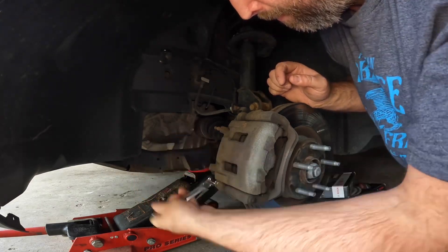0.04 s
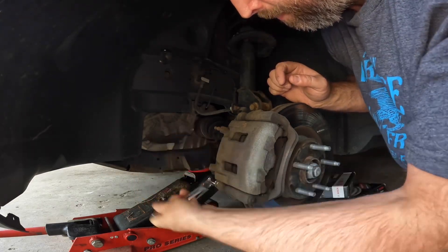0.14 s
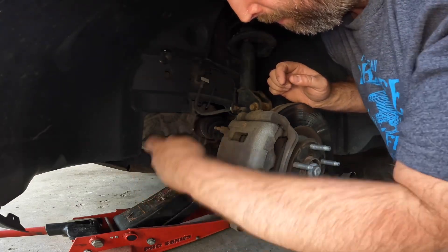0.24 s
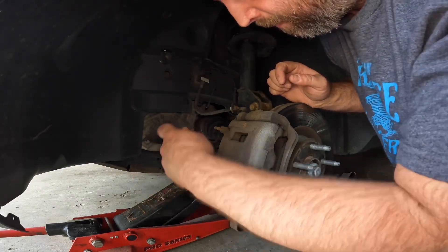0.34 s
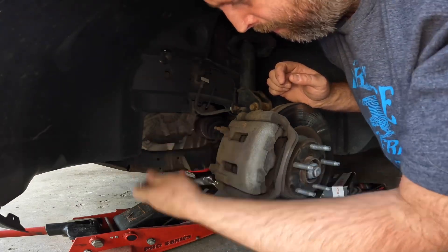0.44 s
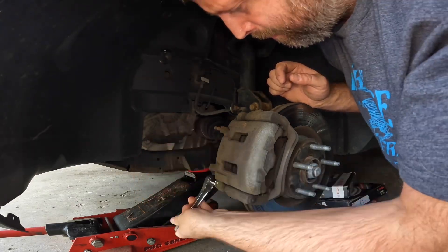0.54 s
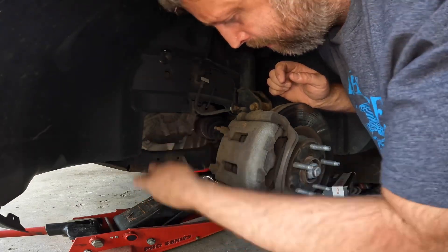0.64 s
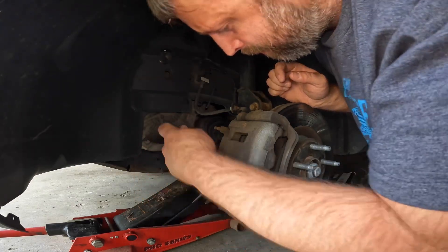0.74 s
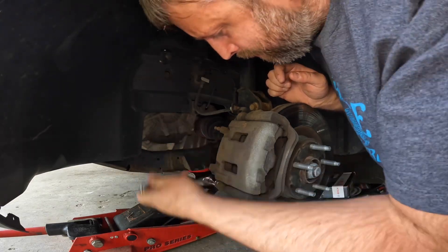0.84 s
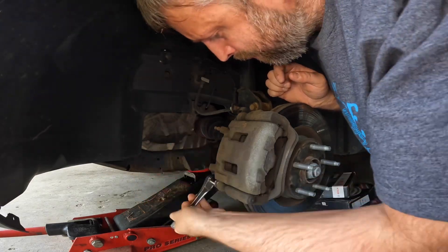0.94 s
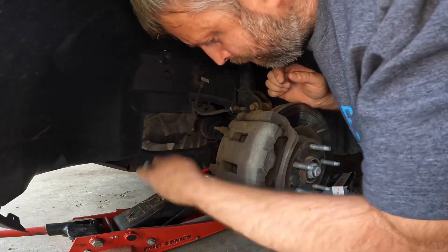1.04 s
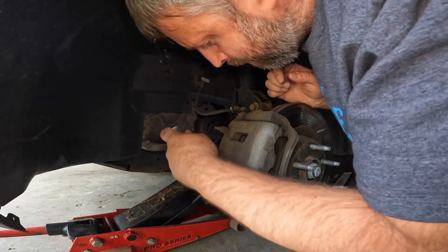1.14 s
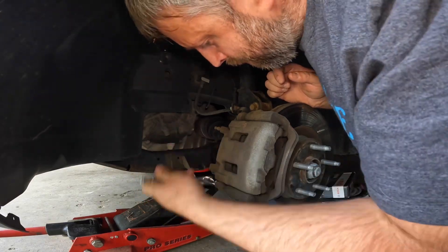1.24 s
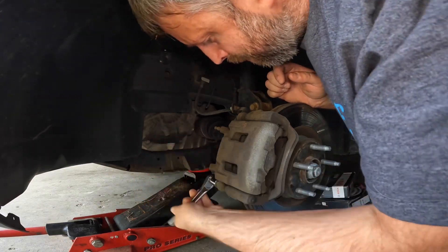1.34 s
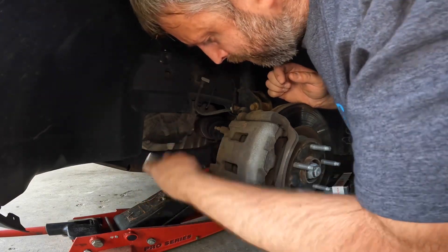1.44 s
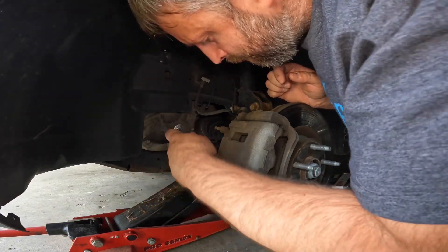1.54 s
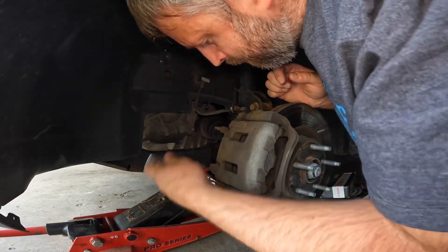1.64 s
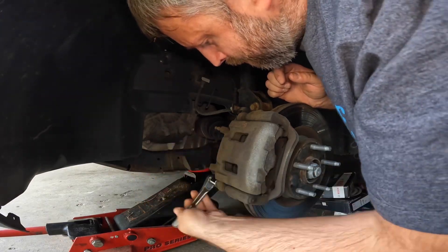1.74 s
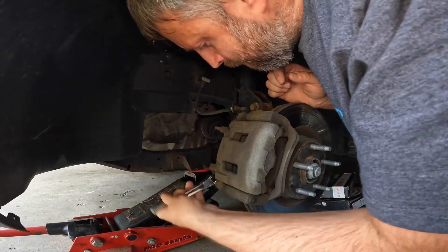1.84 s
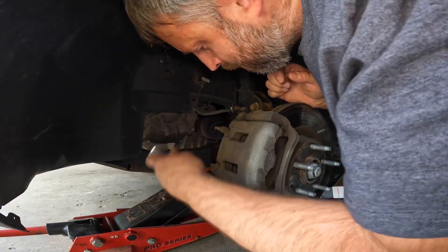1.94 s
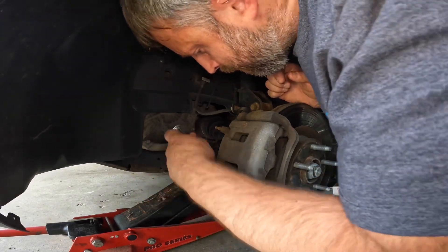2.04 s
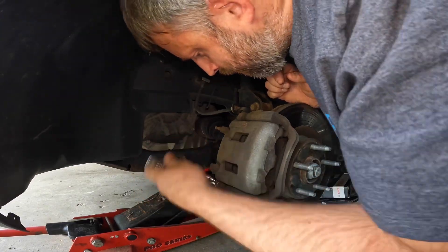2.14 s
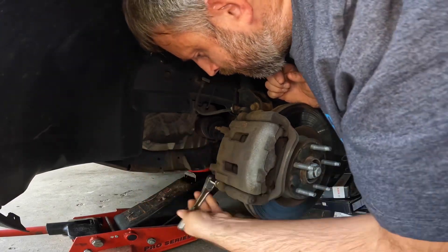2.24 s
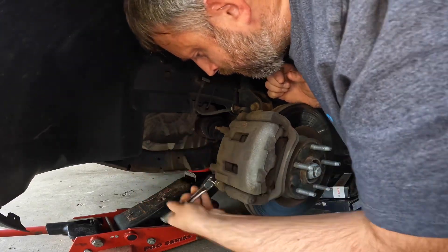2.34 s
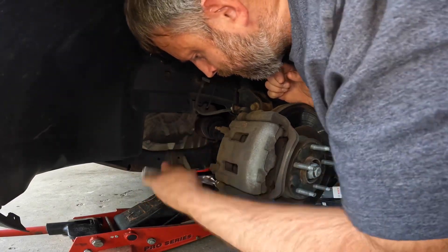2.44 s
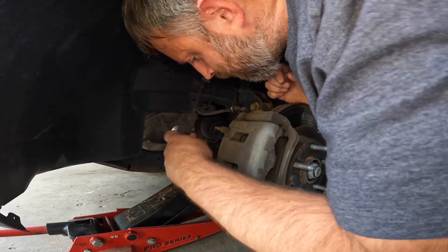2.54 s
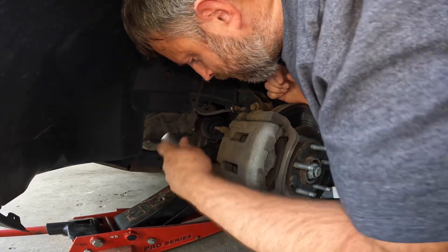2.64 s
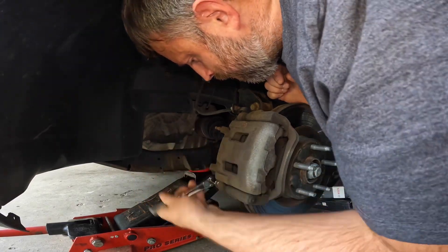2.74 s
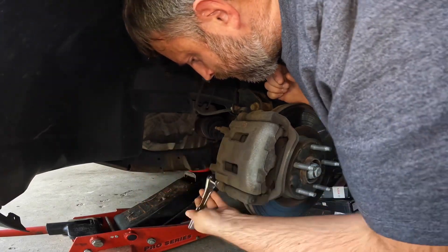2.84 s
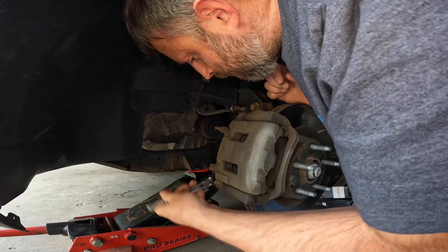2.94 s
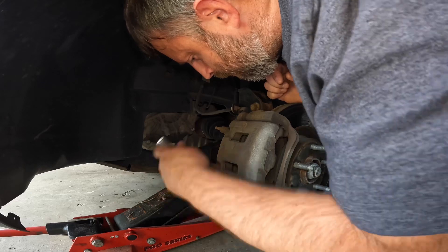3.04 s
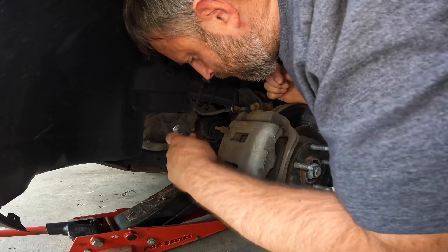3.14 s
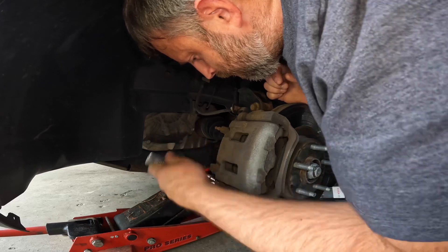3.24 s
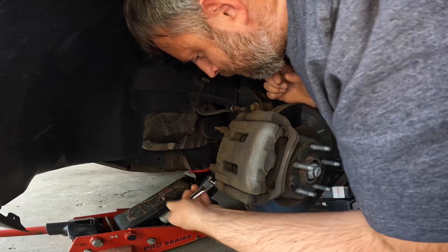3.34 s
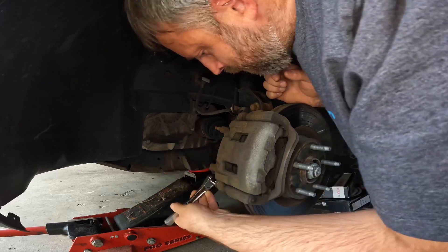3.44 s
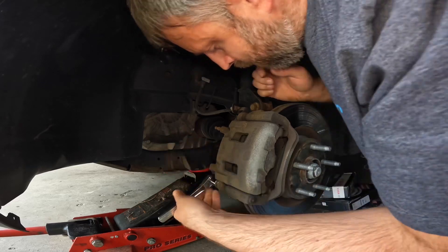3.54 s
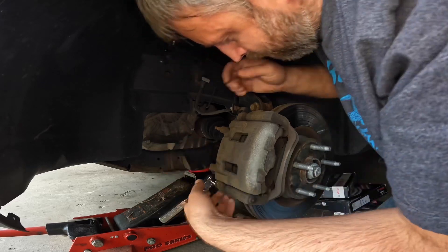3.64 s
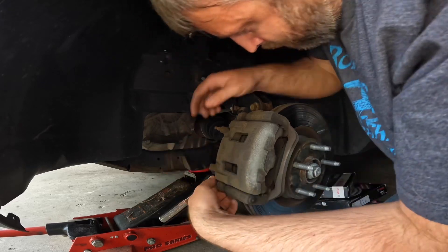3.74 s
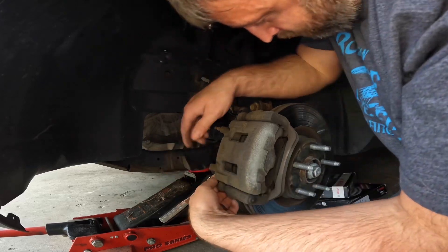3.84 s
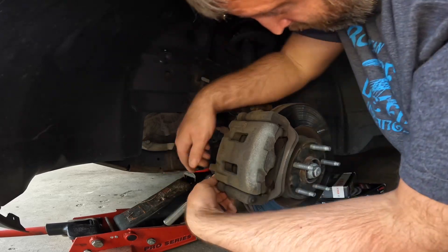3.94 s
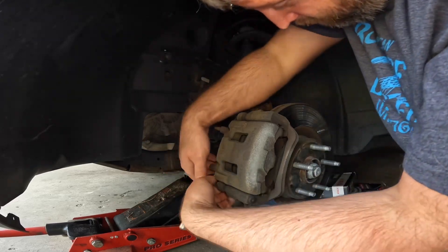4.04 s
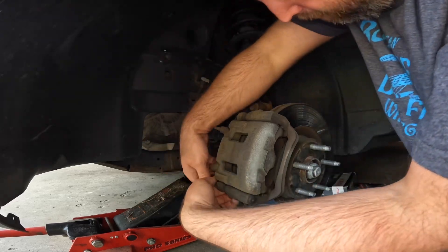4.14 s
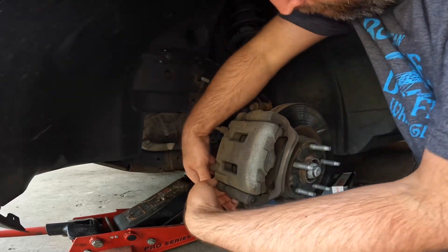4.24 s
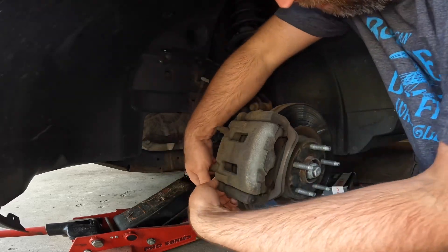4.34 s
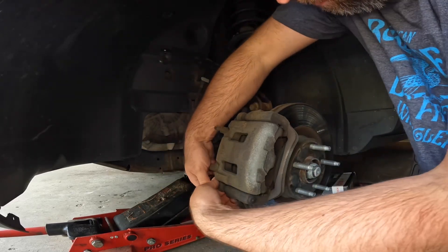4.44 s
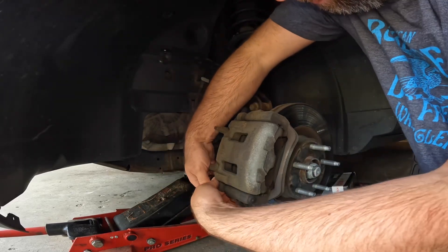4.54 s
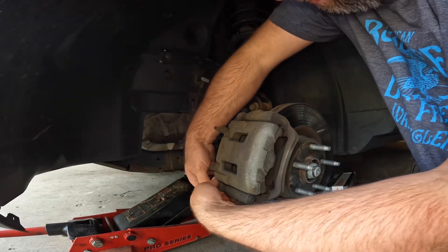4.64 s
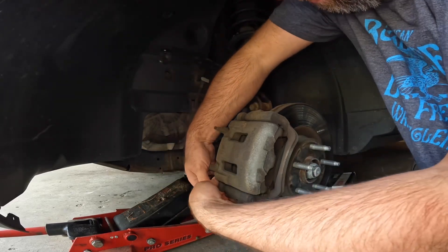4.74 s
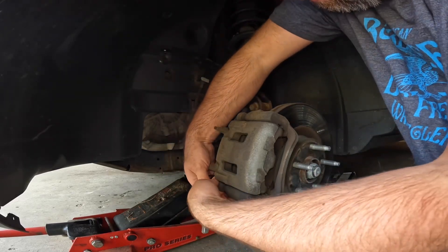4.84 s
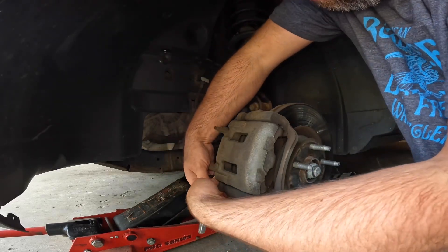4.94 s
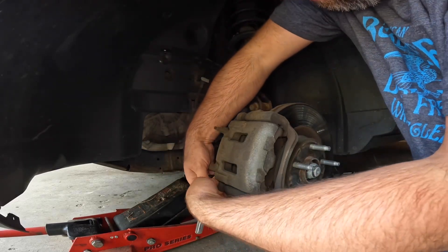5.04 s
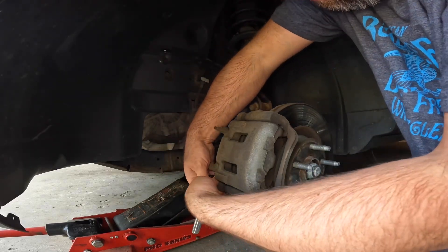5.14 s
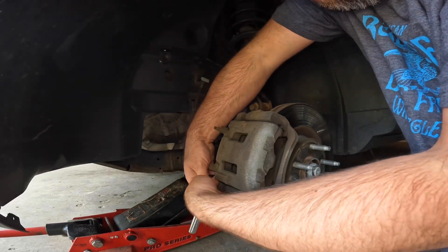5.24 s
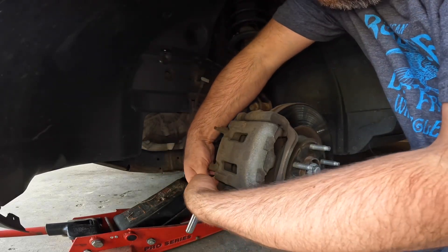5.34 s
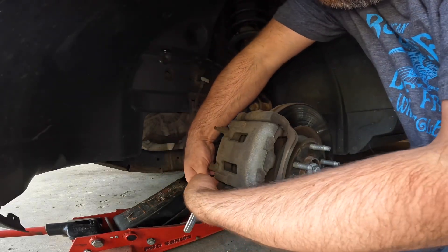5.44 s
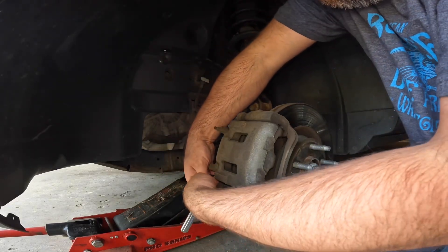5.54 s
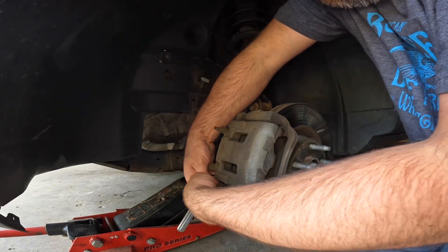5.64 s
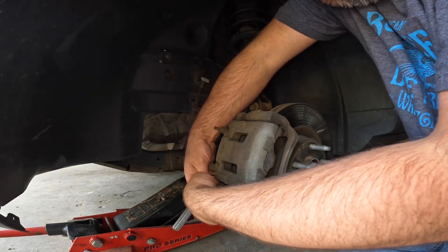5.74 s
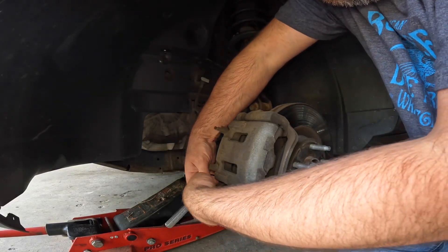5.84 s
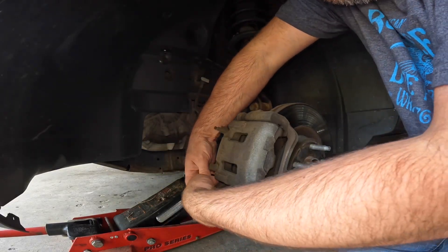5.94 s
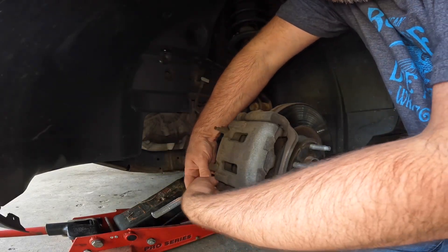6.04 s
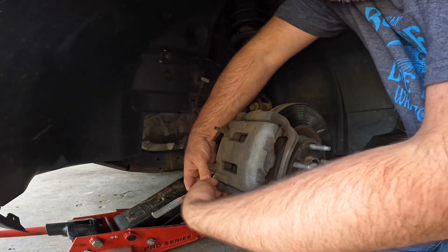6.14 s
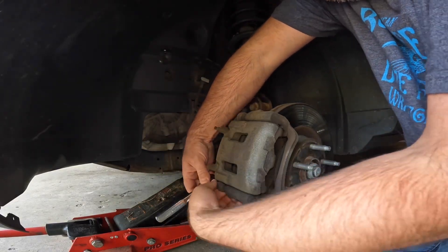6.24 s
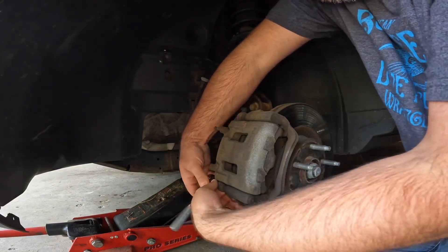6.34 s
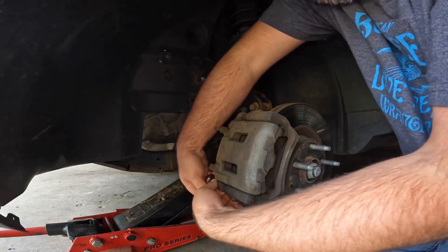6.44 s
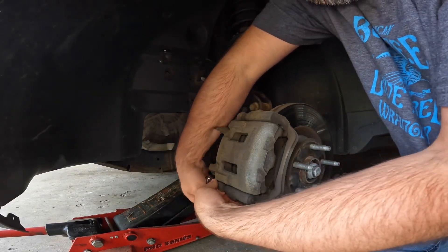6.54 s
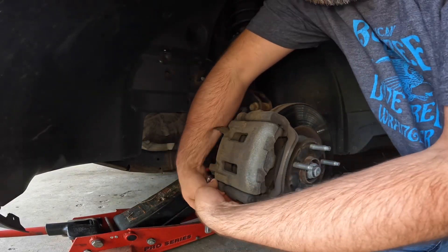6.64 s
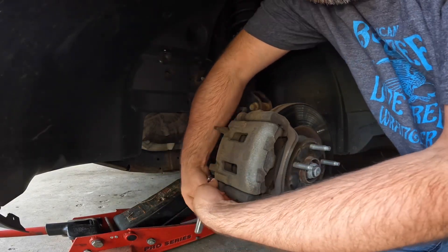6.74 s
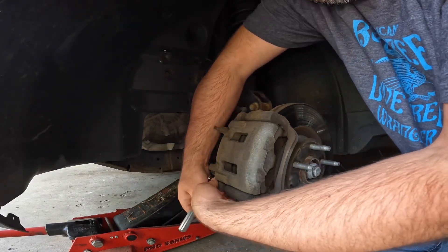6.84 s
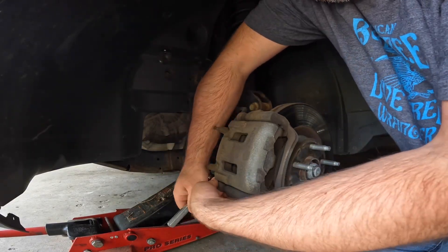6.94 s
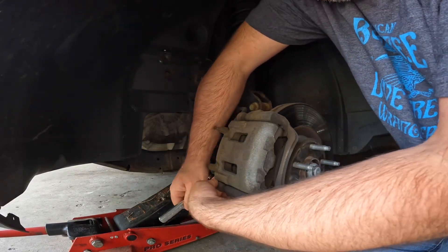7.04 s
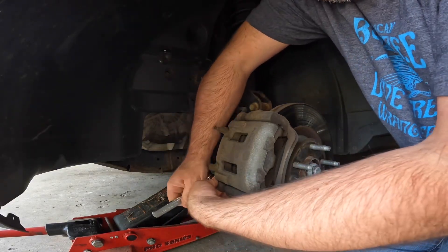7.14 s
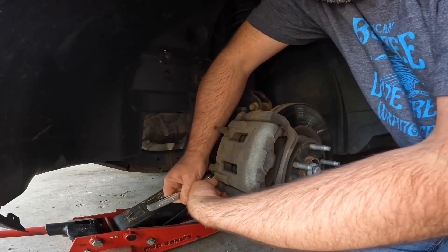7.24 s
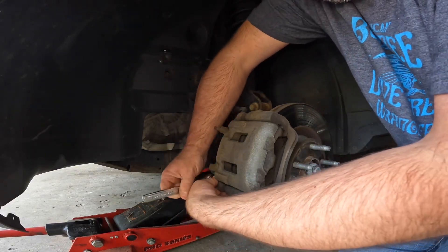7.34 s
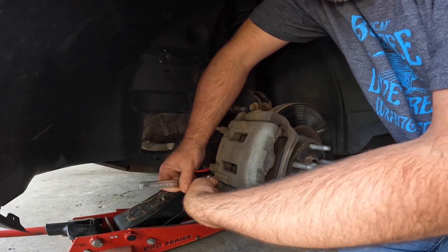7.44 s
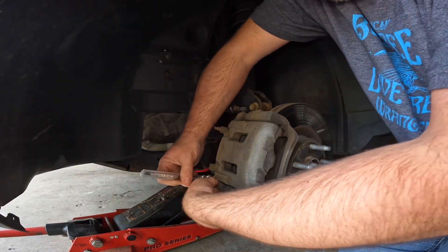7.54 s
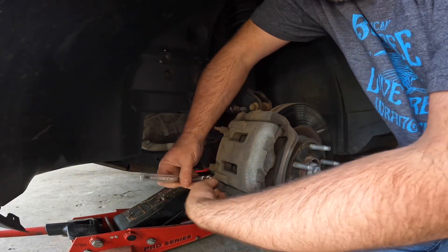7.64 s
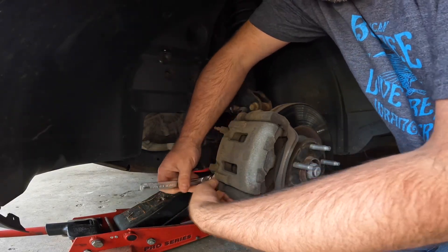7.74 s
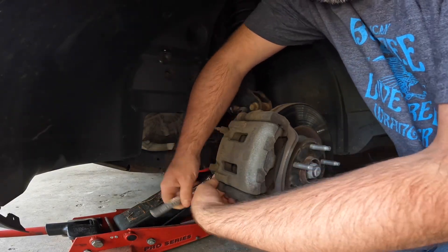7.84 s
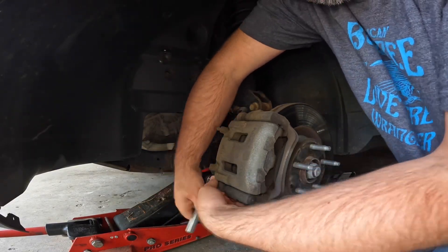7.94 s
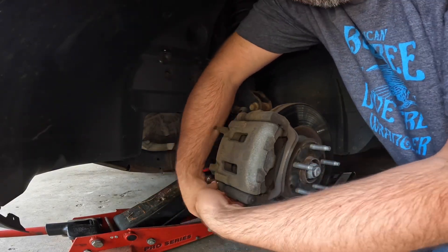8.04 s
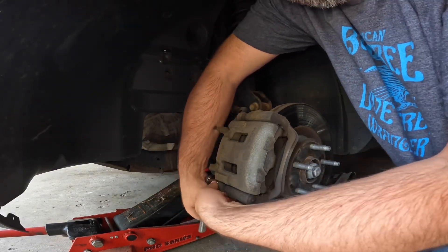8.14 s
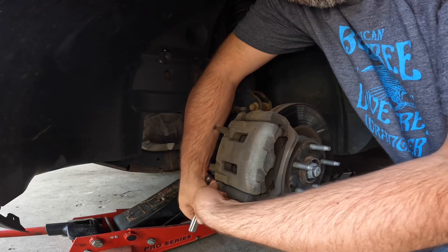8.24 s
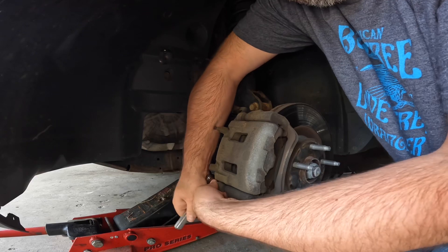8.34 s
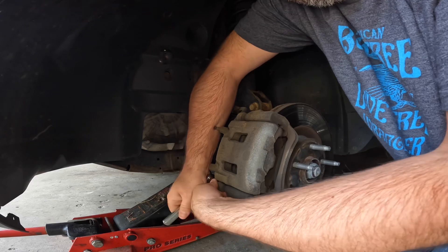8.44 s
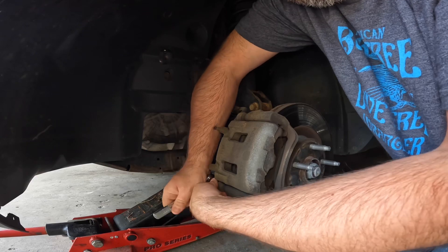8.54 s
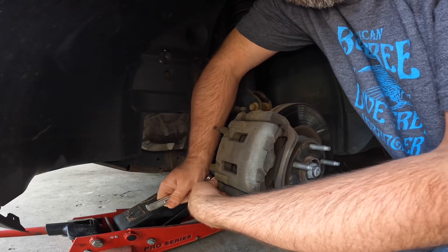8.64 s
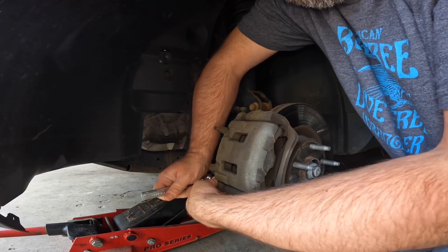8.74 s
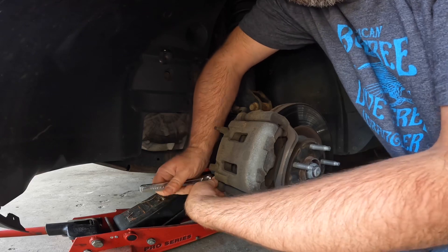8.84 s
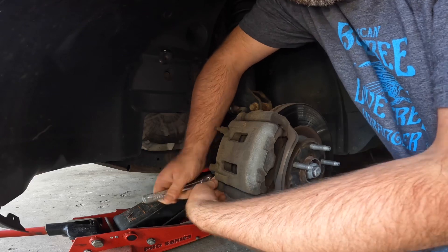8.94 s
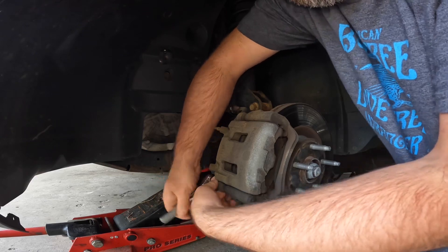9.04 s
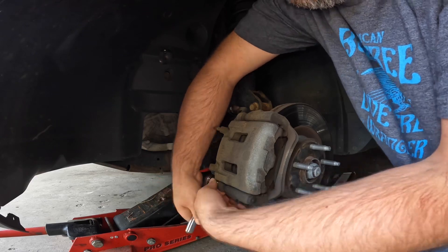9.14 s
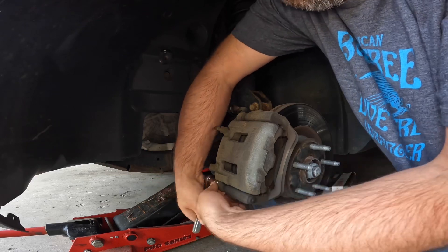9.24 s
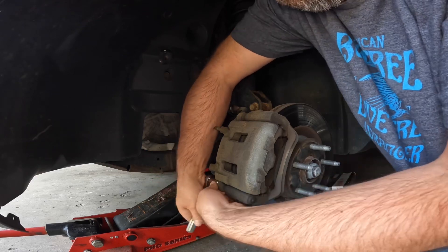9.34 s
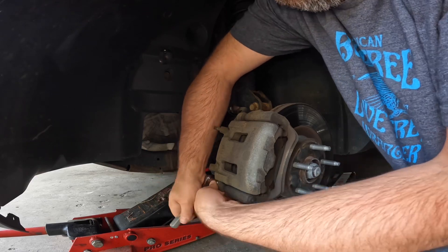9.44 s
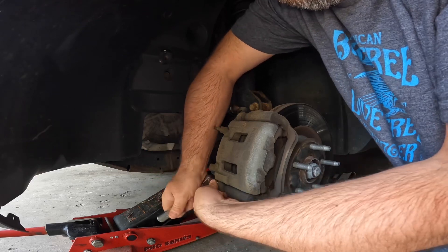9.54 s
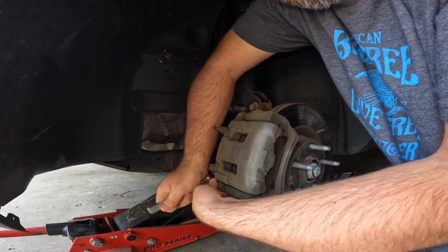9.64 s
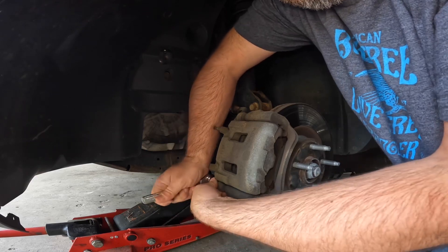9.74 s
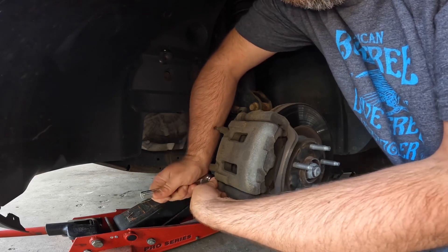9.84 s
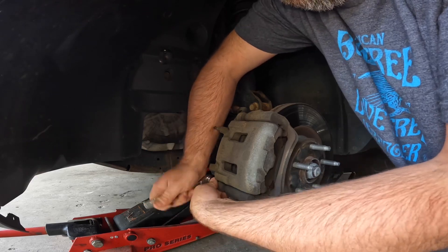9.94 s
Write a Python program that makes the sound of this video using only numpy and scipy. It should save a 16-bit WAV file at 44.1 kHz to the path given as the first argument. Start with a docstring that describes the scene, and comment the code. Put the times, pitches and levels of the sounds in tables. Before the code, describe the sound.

Inside a vehicle's wheel well, a ratchet's pawl rattles over its teeth in short regular bursts, with loose socket knocks and dull hub shudders between. After a thump on the camera and cloth rustle, a second hand steadies the tool; clicks become sparse, slow and hollow. Low air movement, faint distant drone and echoing bird chirps surround the close mono pickup.

```python
"""Inside a wheel well in a quiet garage: a hand ratchet backs a bolt out of a caliper, close to a mono camera.
Quick back-swings rattle the pawl over its teeth, and socket and bolt clank: noise bursts that ring steel modes.
Then soft bumps, damped low sines, reach the camera; a second hand steadies the head and a few slow runs follow.
The arms stir the air at the microphone as slow shaped noise, over room air and a faint distant drone.
Small birds chirp outside as gliding, fluttering tones that echo in the garage."""
import sys
import numpy as np
from scipy import signal
from scipy.fft import rfft, irfft, next_fast_len
from scipy.io import wavfile
from scipy.ndimage import uniform_filter1d

SR = 44100
rng = np.random.default_rng(int(sys.argv[2]) if len(sys.argv) > 2 else 0)


def generate_wav(sig):
    """Save sig (samples, or channels by samples) to the path in sys.argv[1] as 16-bit PCM at SR."""
    pcm = np.round(np.clip(np.atleast_2d(sig).T, -1, 1) * 32767).astype(np.int16)
    wavfile.write(sys.argv[1], SR, pcm)


N = 440559
TIME = np.arange(N) / SR
AGE = np.arange(SR // 3) / SR  # seconds since a blow
HELD_FROM_S = 3.8  # the second hand holds the ratchet head from here on
TOP_HZ = 16000  # band limit of the camera


def amp(db):
    """Decibels to gain."""
    return 10 ** (np.asarray(db) / 20)


def unit(x, size=None):
    """x scaled so that its first size samples have rms 1."""
    return x / np.sqrt(np.mean(x[:size] ** 2) + 1e-20)


def along(points, hz):
    """(Hz, value) points read on a log axis."""
    f, v = np.transpose(points)
    return np.interp(np.log(hz + 1), np.log(f + 1), v)


def curve(rows):
    """(seconds, value) rows as one value per sample."""
    return np.interp(TIME, *np.transpose(rows))


def fade(t, t60):
    """Exponential decay by 60 dB in t60 seconds."""
    return np.exp(-np.log(1000) * t / t60)


def add(track, s, sound):
    """Mix a sound into the track at s seconds."""
    start = max(round(s * SR), 0)
    track[start:start + len(sound)] += sound[:N - start]


def coloured(x, points):
    """x through a causal, minimum-phase filter with the given (Hz, dB) gain."""
    m = 2 * next_fast_len(len(x) // 2 + 2048, real=True)
    log_gain = np.log(amp(along(points, np.fft.rfftfreq(m, 1 / SR))))
    cepstrum = irfft(log_gain)
    # folding the cepstrum onto positive time makes the filter causal
    cepstrum[1:m // 2] *= 2
    cepstrum[m // 2 + 1:] = 0
    response = np.exp(rfft(cepstrum))
    return irfft(rfft(x, m) * response)[:len(x)]


def noise(points, size):
    """Coloured noise of rms 1."""
    return unit(coloured(rng.standard_normal(size), points))


def tail(decays, size):
    """A fresh diffuse echo of energy 1: noise whose bands die away at their own rates."""
    hz, t, bands = signal.stft(rng.standard_normal(size), SR, nperseg=256)
    decay = fade(t, along(decays, hz)[:, None])
    echo = signal.istft(bands * decay, SR, nperseg=256)[1]
    return echo / np.linalg.norm(echo)


# Still air of the garage at the microphone. Each row: frequency in Hz, relative level in dB.
ROOM_COLOUR = [(10, -25), (35, -8), (64, -13), (233, -16), (404, -24), (800, -23), (1300, -29), (2100, -33),
               (3500, -32), (5000, -37), (8000, -42), (16000, -44)]
ROOM_DB = -60.7
# Hum of the distant drone. Each row: frequency in Hz, relative level in dB.
HUM_COLOUR = [(40, -15.5), (64, 9.5), (85, -14), (115, -5), (160, 7.5), (215, -5), (265, 1), (350, -15),
              (600, -30), (1500, -73)]
# Rise and fall of that hum. Each row: time in seconds, relative level in dB.
DRONE_LEVEL = [(4.45, -60), (4.51, -58), (7.13, -61), (7.23, -56), (9.43, -70), (9.99, -82)]
# Strongest note of the drone. Each row: time in seconds, level in dB.
NOTE_SWELL = [(4.3, -69), (4.5, -63.5), (6.9, -66), (7.5, -57.5), (8.2, -61), (8.9, -63.5), (9.5, -87)]


def background():
    """Still room air and a low distant drone, whose strongest note swells for a while: shaped noises."""
    note_colour = [(70, -48.5), (102, -23), (113, -9.5), (126, -16.5), (180, -62.0), (500, -100)]
    note = amp(curve(NOTE_SWELL)) * noise(note_colour, N)
    hum = amp(curve(DRONE_LEVEL) - 5.5) * noise(HUM_COLOUR, N)
    return amp(ROOM_DB) * noise(ROOM_COLOUR, N) + hum + note


def chirp(length, from_hz, to_hz, rough, arch=0.0298):
    """A small bird's note: an arched glide with a rough, fluttering pitch."""
    u = np.linspace(0, 1, round(length * SR))
    flutter = unit(uniform_filter1d(rng.standard_normal(len(u)), size=36))
    glide = from_hz + (to_hz - from_hz) * u
    hz = glide * (1 + arch * np.sin(np.pi * u) + rough * flutter)
    return unit(np.sin(np.pi * u) * np.sin(2 * np.pi * np.cumsum(hz) / SR))


# Reverberation of the garage. Each row: frequency in Hz, 60 dB decay time in seconds.
GARAGE_DECAY = [(300, 1), (2000, 0.63), (5000, 0.46), (12000, 0.098)]
# Nearer birds outside. Each row: start in seconds, length in seconds, glide from Hz, glide to Hz,
# relative level in dB, pitch flutter as an rms share.
NEAR_CHIRPS = [(2.49, .06, 4210, 4770, -63, 0.1), (2.558, 0.071, 3180, 2754, -57.5, 0.12),
               (2.558, 0.072, 5700, 5100, -65, .08), (2.826, 0.068, 3140, 2940, -51, .06),
               (4.68, 0.073, 3220, 2590, -60, 0.11), (4.679, 0.065, 5500, 5060, -65.5, .08),
               (4.792, 0.044, 4710, 5060, -60, 0.05), (5.972, 0.11, 3225, 3890, -55, .05),
               (5.99, .11, 3970, 4880, -54.5, 0.1), (6.063, 0.077, 3090, 2900, -48.5, 0.07),
               (6.723, 0.031, 4900, 5030, -63.5, 0.06), (7.717, .09, 3325, 4000, -51, .06),
               (8.162, 0.038, 4180, 4120, -62, 0.01), (8.761, 0.084, 4180, 4200, -63.5, 0.03)]
# farther birds: relative level, middle pitch, its log spread, length in seconds, flutter share
FLOCK_DB, FLOCK_HZ, FLOCK_SPREAD, FLOCK_CHIRP_S, FLOCK_ROUGH = -72, 3770, 0.13, .08, 0.0544


def birds(count, direct_db, wet_db):
    """Small birds chirp outside, a few near and many far, and echo diffusely in the garage."""
    track = np.zeros(N)
    for s, length, from_hz, to_hz, db, rough in NEAR_CHIRPS:
        add(track, s, amp(db) * chirp(length, from_hz, to_hz, rough))
    for k in range(count):
        from_hz, to_hz = FLOCK_HZ * np.exp(FLOCK_SPREAD * rng.standard_normal(2))
        s = (k + rng.random()) / count * TIME[-1]  # one at random in each equal share of the time
        add(track, s, amp(FLOCK_DB) * chirp(FLOCK_CHIRP_S, from_hz, to_hz, FLOCK_ROUGH))
    echo = signal.fftconvolve(track, tail(GARAGE_DECAY, size=16384))[:N]
    return amp(direct_db) * track + amp(wet_db) * echo


# Air stirred by the arms at the microphone. Each row: time in seconds, relative level in dB.
AIR_LEVEL = [(0.0, -43.5), (0.5, -50.5), (0.8, -45.5), (1.05, -49), (1.89, -40.5), (3.62, -49),
             (3.7, -35.5), (4.48, -60), (5.65, -49.5), (5.95, -52), (9.93, -59.5), (9.99, -54.5)]
# Colour of that air. Each row: frequency in Hz, relative dB per Hz.
DRAUGHT_COLOUR = [(3, -5.5), (8, 3), (13, 0), (19, -13), (27, -16.5), (45, -25), (80, -36.5), (200, -44),
                  (600, -97)]
# Sleeve brushing past. Each row: time in seconds, relative level in dB.
CLOTH_LEVEL = [(3.45, -41), (3.66, -52), (3.7, -40.5), (3.86, -46.5), (4.045, -47.5), (4.074, -37.5),
               (4.16, -43.5), (4.35, -61)]
# Colour of the sleeve. Each row: frequency in Hz, relative dB per Hz.
SLEEVE_COLOUR = [(20, 9), (60, 1.5), (200, -5.5), (400, -9.5), (800, -16.5), (2000, -29), (6000, -54)]


def arms():
    """Moving arms push slow waves of air at the microphone, and a sleeve brushes past: shaped noises."""
    draught = amp(curve(AIR_LEVEL) + 6.5) * noise(DRAUGHT_COLOUR, N)
    passing = curve([(3.4, 0), (3.55, 0.98), (4.2, 0.76), (4.35, 0.57)])
    sleeve = passing * amp(curve(CLOTH_LEVEL) - 1.5) * noise(SLEEVE_COLOUR, N)
    return draught + sleeve


# Soft bumps on the camera. Each row: start in seconds, relative thud level in dB, tick level in dB.
CAMERA_BUMPS = [(3.673, -26, -34), (3.6885, -12, -19.5), (3.718, -27, -41), (3.739, -35, -45),
                (3.906, -30, -47), (6.079, -60, -39)]


def bumps():
    """A soft touch on the camera: a tick of its case, then one heavily damped push."""
    track = np.zeros(N)
    for s, thud_db, tick_db in CAMERA_BUMPS:
        tick = np.sin(2 * np.pi * 1450 * AGE) * fade(AGE, 0.0048)
        push = np.sin(2 * np.pi * 175 * AGE) * fade(AGE, 0.014)
        add(track, s, amp(tick_db) * tick)
        add(track, s + 0.00172, amp(thud_db + 0.5) * push)
    return track


# Short, dull low shudders: the hanging hub under hard pushes, and at 4.07 s a soft bump as the sleeve passes.
# Each row: start in seconds, relative level in dB.
LOW_SHUDDERS = [(0.301, -44.5), (1.541, -42), (2.025, -34), (3.117, -40.5), (4.07, -54)]


def shudders():
    """Bursts of low noise that die away: the hub under hard pushes, and one soft bump by the sleeve."""
    track = np.zeros(N)
    colour = [(15, -24), (40, -7), (70, -4), (100, -13), (180, -16.0), (400, -26), (1200, -49)]
    for s, db in LOW_SHUDDERS:
        shudder = noise(colour, len(AGE)) * fade(AGE, 0.22) * (1 - np.exp(-AGE / 0.0036))
        add(track, s, amp(db - 9.5) * unit(shudder, size=2000))
    return track


# Reverberation close inside the wheel well. Each row: frequency in Hz, 60 dB decay time in seconds.
WELL_DECAY = [(300, 0.27), (2000, 0.24), (5000, 0.073), (12000, 0.098)]


def in_well(x, wet_db, delay):
    """The wheel well answers each blow a little differently as the arm moves; delay in seconds."""
    echo = np.pad(tail(WELL_DECAY, size=6144), (round(delay * SR), 0))
    return x + amp(wet_db) * signal.fftconvolve(x, echo)[:len(x)]


def ring(modes, scatter_db, detune, attack, damping, size):
    """Steel modes; the shifting grip gives every blow new strengths and slightly new pitches."""
    hz, db, t60 = np.transpose(modes)[:, :, None]
    t = AGE[:size]
    strength = amp(db + scatter_db * rng.standard_normal(hz.shape))
    pitch = hz * (1 + detune * rng.standard_normal(hz.shape))
    phase = 2 * np.pi * (pitch * t + rng.random(hz.shape))
    modes_sum = (strength * fade(t, t60 / damping) * np.sin(phase)).sum(0)
    return modes_sum * (1 - np.exp(-t / attack))


# Modes of the ratchet head. Each row: frequency in Hz before detuning, relative level in dB,
# 60 dB decay time in seconds before damping.
HEAD_MODES = [(3570, -18, 0.085), (3948, -9.5, 0.058), (3978, -9, 0.027), (4167, -0.5, 0.051),
              (4585, -8, 0.019), (5170, -6.5, 0.013), (5140, 5, 0.0066), (6040, -22, 0.013),
              (6156, -2.5, 0.0092), (6403, 2, 0.016), (6910, -7.5, 0.013), (8175, -9.5, 0.016),
              (11500, -20, 0.04), (11300, -25, 0.012), (14500, -34, .018)]
# Fingers touching the tool. Each row: start in seconds, level in dB, centre frequency in Hz.
FINGER_TICKS = [(2.126, -60, 5500), (3.454, -52, 4860), (3.952, -57.5, 4460), (4.786, -54.5, 4200),
                (6.324, -51, 4060), (8.126, -57.5, 4160), (8.936, -56, 5380)]


def fingers():
    """Fingers shifting on the tool make small noise ticks that faintly ring its head."""
    track = np.zeros(N)
    for s, db, hz in FINGER_TICKS:
        colour = [(hz / 8, -18), (hz / 2, -8), (hz, 0), (hz * 2, -12), (hz * 4, -32)]
        touch = noise(colour, len(AGE)) * fade(AGE, .02)
        head = ring(HEAD_MODES, scatter_db=2, detune=.003, attack=0.0032, damping=0.96, size=len(AGE))
        tick = unit(touch, size=265) + amp(-5) * unit(head, size=265)
        tick = in_well(tick, wet_db=-7, delay=.003)
        add(track, s, amp(db) * unit(tick, size=265))
    return track


# Back-swings of the handle. Each row: start in seconds, length in seconds, number of teeth,
# slowing towards the end as a share, easing at both ends as a share, relative level in dB,
# change over the swing in dB.
BACK_SWINGS = [(0.009, .079, 6, -.07, .29, -34, -12), (0.449, .0907, 7, .05, -.1, -30, -16),
               (0.8572, .0942, 7, .36, .54, -36.5, -11), (1.2627, .0866, 7, .27, .32, -33, -6),
               (1.6704, .0563, 5, 0, .03, -31, -8), (2.1682, .1113, 9, .2, .22, -31.5, -3),
               (2.7134, .1206, 9, .2, .22, -33, -6), (3.2743, .1358, 9, .1, .05, -32, -7),
               (4.0566, .1663, 6, .28, .1, -40.5, 3), (6.3898, .1192, 5, .42, .36, -34.5, -1),
               (7.782, .2487, 9, .11, .35, -35, 0), (9.005, .1278, 4, .16, .35, -37, 3)]
SOFT_ENDS_DB = -2.5  # teeth at both ends of a swing against those in its middle
TOOTH_BODY_DB, TOOTH_TREBLE_DB = -4.5, 3  # usual colour of a click
LEVEL_SCATTER_DB, BODY_SCATTER_DB, TREBLE_SCATTER_DB = 1.1, 2.5, 1.5  # from tooth to tooth


def teeth():
    """One click per tooth; slowing and easing bend the even spacing and the level drifts over the swing."""
    rows = []
    for start, length, count, slowing, ease, db, change_db in BACK_SWINGS:
        u = np.linspace(0, 1, round(count))  # share of the arc travelled
        bend = u * (1 - u) * (ease * (1 - 2 * u) - slowing)
        s = start + length * (u + bend)
        level, body, treble = rng.standard_normal((len(u), 3)).T
        level_db = db + change_db * u + SOFT_ENDS_DB * (2 * u - 1) ** 2 + LEVEL_SCATTER_DB * level
        body_db = TOOTH_BODY_DB + BODY_SCATTER_DB * body
        treble_db = TOOTH_TREBLE_DB + TREBLE_SCATTER_DB * treble
        rows += zip(s, level_db, body_db, treble_db)
    return rows


# play taken up before the first tooth of a free swing: lead in seconds, relative levels
SLACK_S, SLACK_CLICK_DB, SLACK_KNOCK_DB = .033, -47.5, -49.5


def slack_times():
    """Each one-handed swing with room before it begins by taking up the play of the socket."""
    return [s - SLACK_S for s, *_ in BACK_SWINGS if SLACK_S < s < HELD_FROM_S]


# Pawl and socket catching as the handle turns round. Each row: start in seconds,
# relative click level in dB, relative knock level in dB, relative low ring in dB.
TURN_CATCHES = [(0.151, -40.5, -49.5, 0), (0.617, -40.5, -44, -9), (1.015, -38, -41, -4.5),
                (1.3958, -37.5, -46, 5), (1.844, -38.5, -46, 8), (2.347, -46.5, -48.5, 5),
                (2.921, -40.5, -49.5, 6.5)]
# Socket shifting on the bolt in mid-stroke. Each row: start in seconds, relative level in dB,
# relative low ring in dB, relative treble in dB.
SOCKET_SHIFTS = [(0.299, -32.5, -2.5, -3.5), (0.481, -41.5, -6, -20), (1.536, -43, 0.5, -8),
                 (1.701, -40.5, -4, -3), (2.021, -37.5, 1, -8), (2.2, -34, -1.5, 3),
                 (3.112, -41, -1, -11.5), (4.436, -54.5, -6, -5.5), (6.632, -57, -12, 2),
                 (7.797, -49.5, 12, 12), (9.084, -45.5, -9, -7), (9.126, -42, 5, 12.5),
                 (9.944, -54.5, 1, -10)]


def socket_knocks(slack_low_db, slack_treble_db, catch_treble_db):
    """Every knock of the socket: (seconds, relative level, low ring and treble in dB)."""
    slack = [(s, SLACK_KNOCK_DB, slack_low_db, slack_treble_db) for s in slack_times()]
    catches = [(s, db, low_db, catch_treble_db) for s, _, db, low_db in TURN_CATCHES]
    return SOCKET_SHIFTS + slack + catches


# Modes of socket, bolt and caliper bracket. Each row: frequency in Hz before detuning,
# relative level in dB, 60 dB decay time in seconds before damping.
BRACKET_MODES = [(386, -12.5, 0.15), (480, -9, 0.079), (653, -10, 0.099), (850, -6.5, 0.077),
                 (1114, -12, 0.084), (1220, -12.5, 0.17), (1354, -18, 0.32), (1626, -17.5, 0.092),
                 (1892, 2.5, 0.12), (1956, 2.5, 0.082), (2192, -4.5, 0.14), (2370, -10, 0.36),
                 (2580, -2, 0.052), (2845, -11, 0.19), (2800, -18, 0.1), (3640, -17, 0.11), (3890, 4, 0.14),
                 (4400, 2.5, 0.22), (5270, -15, 0.12)]
# Contact noise of a knock. Each row: frequency in Hz, relative level in dB.
KNOCK_COLOUR = [(60, -23.5), (300, -12), (900, -3.5), (1600, -10), (2600, -2), (4200, 4), (7000, -4),
                (10000, -26), (16000, -57)]
THUD_DB = 5  # thud of a knock over its low ring


def socket():
    """The loose socket chatters on the bolt, rings the bracket and thuds into the hub."""
    track, size = np.zeros(N), len(AGE)
    for s, db, low_db, treble_db in socket_knocks(slack_low_db=2, slack_treble_db=-1, catch_treble_db=-20):
        damping = 1.8 if s > HELD_FROM_S else 1.1
        chatter = noise(KNOCK_COLOUR, size) * fade(AGE, 0.057) * (1 - np.exp(-AGE / 0.0009))
        steel = ring(BRACKET_MODES, scatter_db=2.0, detune=0.0025, attack=0.0027, damping=damping, size=size)
        knock = unit(steel, size=800) + amp(6.5) * unit(chatter, size=800)
        knock = in_well(knock, wet_db=-2.5, delay=0.002905)
        colour = [(500, low_db + THUD_DB), (850, low_db - 1), (1350, low_db + 4.5),
                  (1850, 0.91), (2800, 0), (3800, treble_db - 4.5)]
        add(track, s, amp(db - 0.5) * unit(coloured(knock, colour), size=800))
    return track


# Lone clicks of the pawl. Each row: start in seconds, relative level in dB,
# body near 4 kHz in dB, treble in dB.
LONE_CLICKS = [(0.9981, -36.5, -29, -11), (3.9718, -55.5, -3, -6), (6.296, -53, -3, -9.5),
               (6.8407, -51, -9, 1), (7.707, -47, -1, 6), (8.9495, -49, 1, -7), (9.2748, -39, -3, 6.5),
               (9.9432, -39, 7, 2)]
SLIP_S, SLIP_DB = 0.014, -9  # the pawl slips once just before it catches


def pawl_drops(slack_body_db, slack_treble_db, catch_body_db, catch_treble_db, slip_treble_db):
    """Every click of the pawl: (seconds, relative level, 4 kHz body and treble in dB)."""
    slack = [(s, SLACK_CLICK_DB, slack_body_db, slack_treble_db) for s in slack_times()]
    rows = teeth() + LONE_CLICKS + slack
    for s, db, _, _ in TURN_CATCHES:
        slip = (s - SLIP_S, db + SLIP_DB, TOOTH_BODY_DB, slip_treble_db)
        rows += [slip, (s, db, catch_body_db, catch_treble_db)]
    return rows


# Contact noise of the pawl on a tooth. Each row: frequency in Hz, relative level in dB.
PAWL_COLOUR = [(200, -21.5), (1500, -22), (3000, -7.5), (4000, 0.5), (5000, 2), (6400, -3), (7500, -9),
               (10000, -19.5), (13000, -23.5), (16000, -25.5)]


def pawl():
    """The pawl scrapes up each tooth and snaps down: a tick, a brief chatter, the ring of head and bracket."""
    track, size = np.zeros(N), SR // 5
    t = AGE[:size]
    drops = pawl_drops(slack_body_db=6, slack_treble_db=0, catch_body_db=-0.5, catch_treble_db=-3,
                       slip_treble_db=2)
    for s, db, body_db, treble_db in drops:
        # a hand round the head softens the tick, damps the bracket and makes the click hollower
        held = s > HELD_FROM_S
        tick_db = -3 if held else 5
        head_db = 1 if held else -1
        damping = 1.8 if held else 1.15
        hollow_db = 3 if held else -1
        chatter_and_tick = fade(t, 0.024) + amp(tick_db) * fade(t, 0.00093)
        snap = noise(PAWL_COLOUR, size) * chatter_and_tick
        head = ring(HEAD_MODES, scatter_db=8.0, detune=0.0025, attack=0.00094, damping=1.2, size=size)
        bracket = ring(BRACKET_MODES, scatter_db=6.5, detune=0.006, attack=0.0072, damping=damping, size=size)
        click = unit(snap, size=265) + amp(head_db) * unit(head, size=265)
        click += amp(-18.5) * unit(bracket, size=265)
        click = in_well(click, wet_db=-5.5, delay=.003)
        colour = [(2700, hollow_db), (4000, body_db), (5500, 0), (6800, 0), (9000, treble_db)]
        click = coloured(click, colour)
        add(track, s, amp(db + 2.5) * unit(click, size=265))
        # the scrape rises up to the snap
        scrape = noise(PAWL_COLOUR, size=350) * fade(AGE[:350], 0.12)[::-1]
        add(track, s - len(scrape) / SR, amp(db - 11) * scrape)
    return track


def scene():
    """The tool, its faint garage echo, the sounds at the camera and the birds, alike in both channels."""
    surroundings = background() + birds(count=80, direct_db=-4, wet_db=-6)
    at_camera = arms() + bumps()
    low_shudders = shudders()
    tool = fingers() + socket() + pawl()
    garage = np.pad(tail(GARAGE_DECAY, size=24576), (600, 0))
    echo = signal.fftconvolve(tool, garage)[:N]
    mono = surroundings + at_camera + low_shudders + tool + amp(-19.5) * echo
    return np.array([mono, mono])


def record(dry):
    """The camera keeps nothing above its band limit."""
    m = next_fast_len(N + SR // 2)
    kept = np.fft.rfftfreq(m, 1 / SR) < TOP_HZ
    return irfft(rfft(dry, m) * kept, m)[:, :N]


dry = scene()
out = record(dry)
generate_wav(out)
```